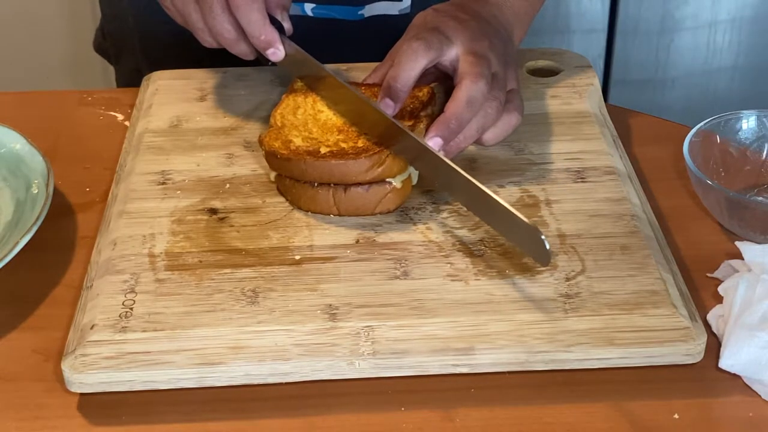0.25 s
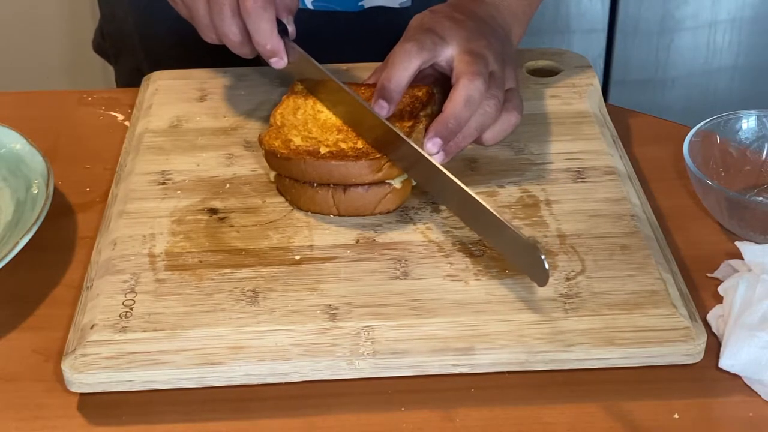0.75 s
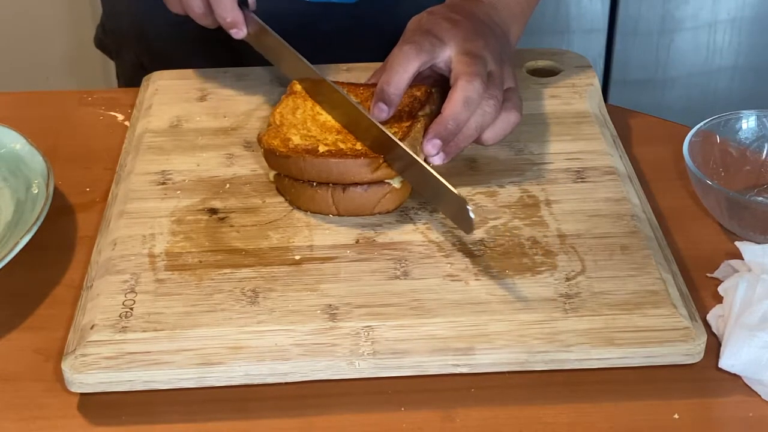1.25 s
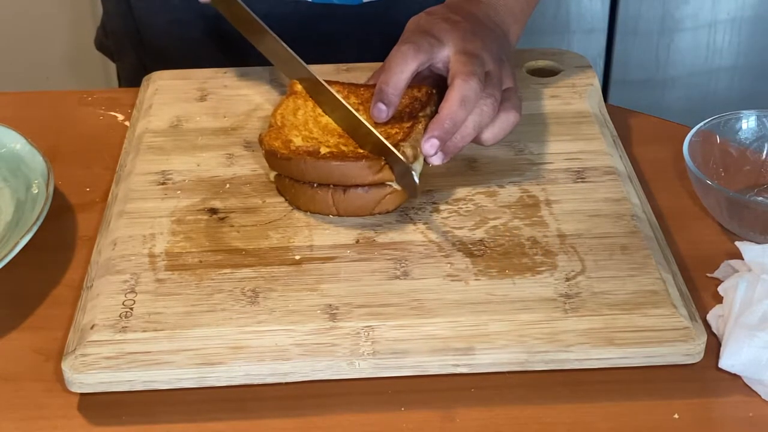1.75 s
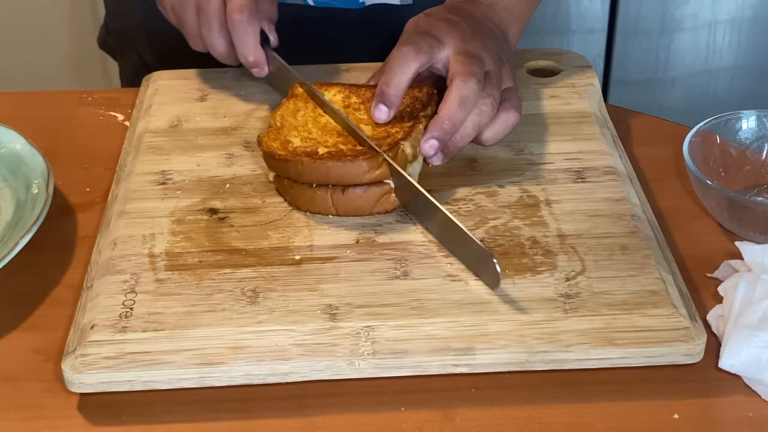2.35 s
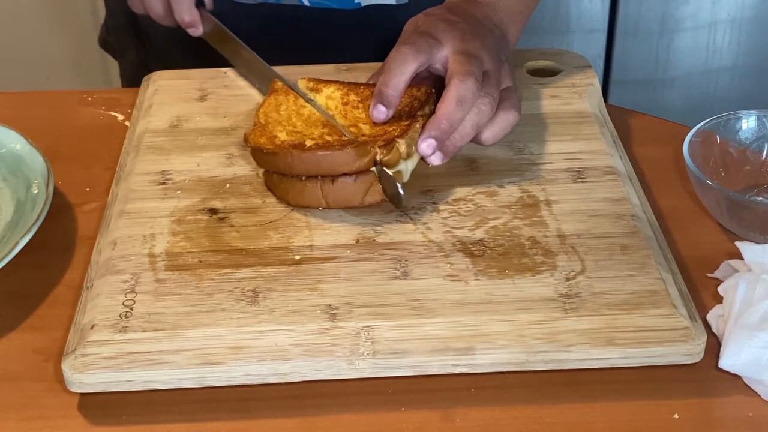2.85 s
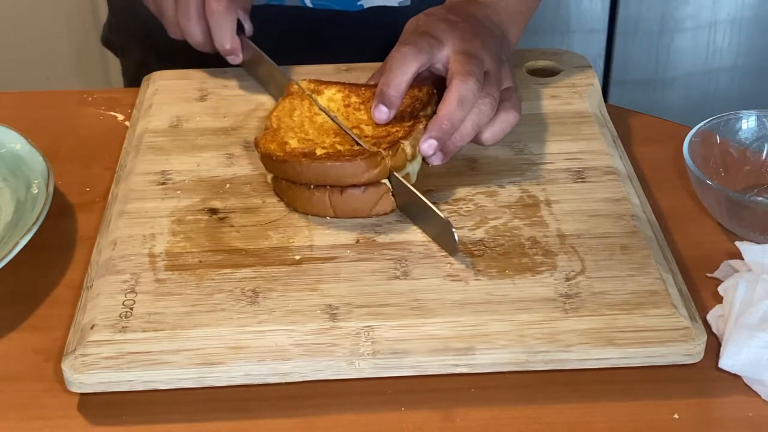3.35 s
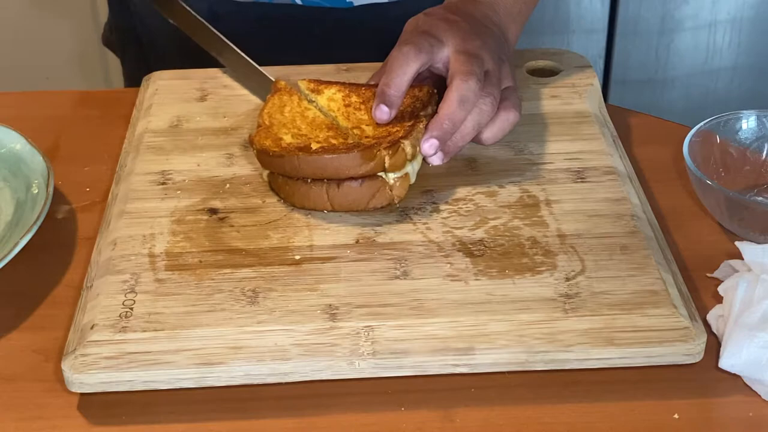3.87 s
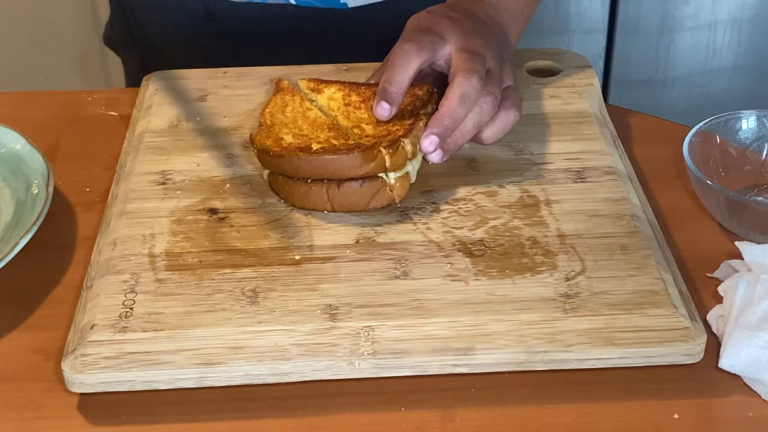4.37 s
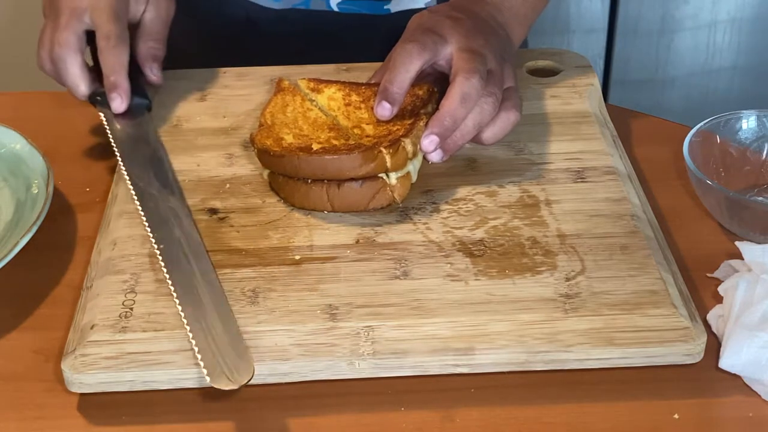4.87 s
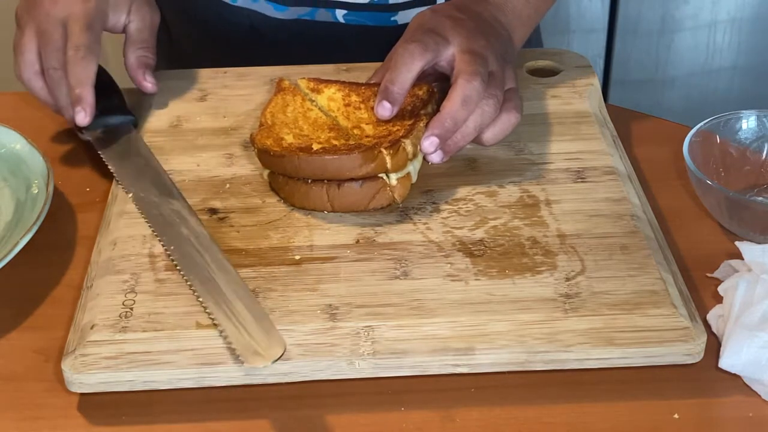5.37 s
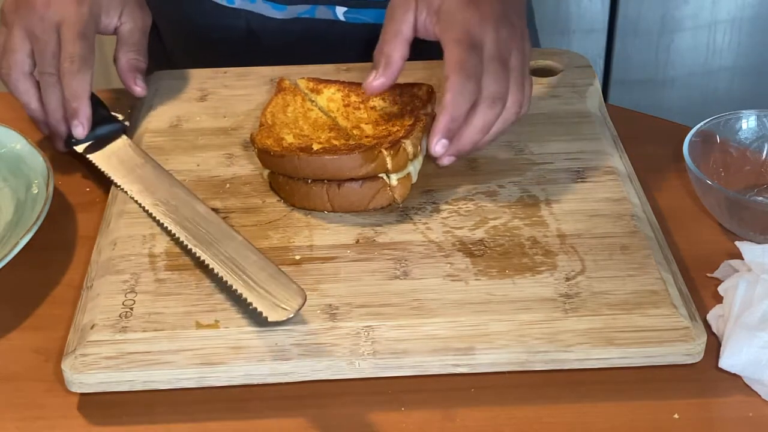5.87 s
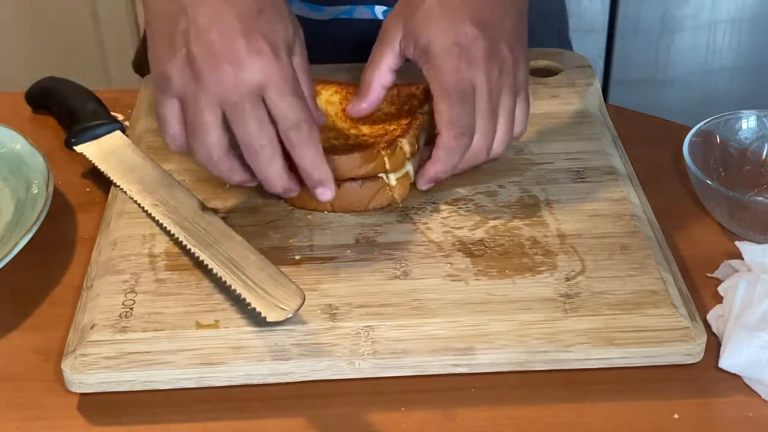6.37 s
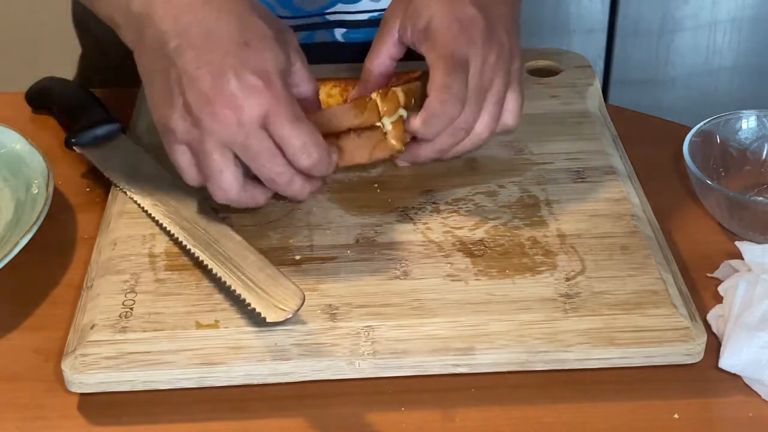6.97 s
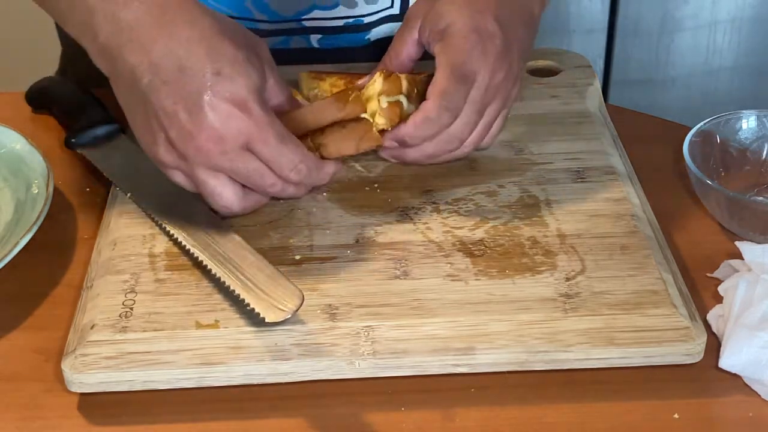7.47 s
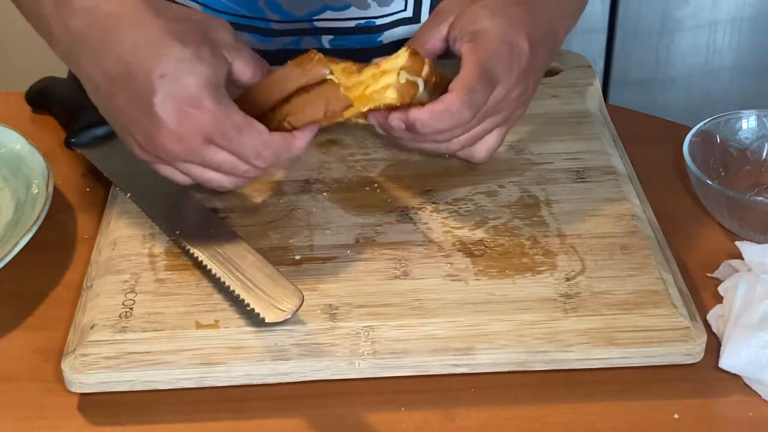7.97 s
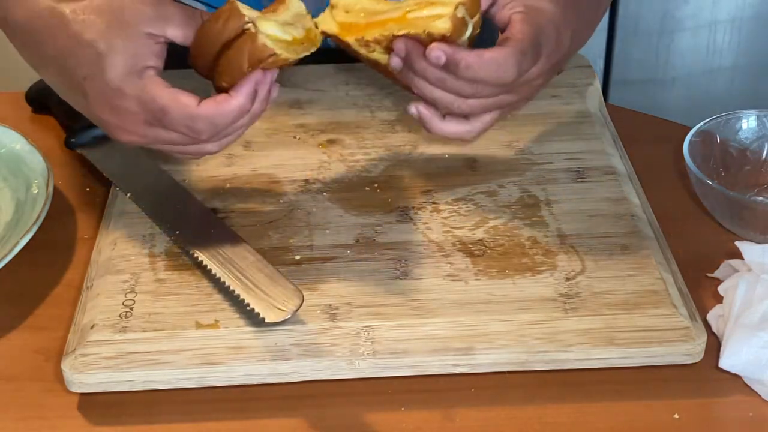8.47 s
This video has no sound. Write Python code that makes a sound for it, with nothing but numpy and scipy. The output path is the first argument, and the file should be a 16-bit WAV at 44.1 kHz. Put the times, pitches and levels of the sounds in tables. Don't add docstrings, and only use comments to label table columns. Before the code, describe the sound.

Crunchy, raspy knife strokes cut toasted bread over a steady low fan hum, followed by a wooden double knock and small dry crackles.

```python
import sys
import numpy as np
from scipy import signal
from scipy.fft import rfft, irfft, next_fast_len
from scipy.io import wavfile
from scipy.ndimage import uniform_filter1d

SR = 44100
rng = np.random.default_rng(int(sys.argv[2]) if len(sys.argv) > 2 else 0)


def master(y):
    cut = np.clip(np.atleast_2d(y).T, -1, 1)
    pcm = np.round(cut * 32767)
    wavfile.write(sys.argv[1], SR, pcm.astype(np.int16))


def gain_from_decibels(decibels):
    exponent = np.asarray(decibels, float) / 20
    return 10 ** exponent


N = 384904
SIZE = 2 * next_fast_len(N // 2 + 1)
HZ = np.maximum(np.fft.rfftfreq(SIZE, 1 / SR), 1)
SPEED_POWER = 1.19

# pitch in Hz, level in dB.
UNLIKE_SHARE = [(50, -36), (130, -13), (300, -15.5), (550, -1.5), (750, 2), (1100, -3), (1400, -3),
                (1800, -18), (2200, -21.5), (3500, -5.5), (6000, -18), (9000, -18), (12500, -15)]


def rms_one(x):
    return x / np.sqrt(np.mean(x ** 2) + 1e-20)


def at_hz(points):
    hz, db = np.transpose(points)
    return np.interp(np.log(HZ), np.log(hz), db)


def filtered(x, response):
    return irfft(rfft(x, SIZE) * response, SIZE)[..., :N]


def coloured(x, spectrum):
    return rms_one(filtered(x, gain_from_decibels(at_hz(spectrum))))


def band(x, low_hz, high_hz):
    edges = [low_hz, min(high_hz, .45 * SR)]
    return signal.sosfilt(signal.butter(2, edges, "band", fs=SR, output="sos"), x)


def resonate(x, hz, width_hz):
    r = np.exp(-np.pi * width_hz / SR)
    feedback = [1, -2 * r * np.cos(2 * np.pi * hz / SR), r * r]
    return signal.lfilter([(1 - r * r) / 2, 0, (r * r - 1) / 2], feedback, x + 1e-18)


def resonate_steep(x, hz, width_hz, outer):
    return resonate(resonate(x, hz, width_hz), hz, outer * width_hz)


def body(x, modes):
    out = 0
    for k, (hz, width_hz, db) in enumerate(modes):
        out = out + gain_from_decibels(db) * resonate_steep(x, hz, width_hz, 2) * (-1) ** k
    return rms_one(out)


def drift(rate_hz):
    r = np.exp(-2 * np.pi * rate_hz / SR)
    return rms_one(signal.lfilter([1], [1, -2 * r, r * r], rng.standard_normal(N + SR))[SR:])


def grains(per_s, spread_db):
    sizes = gain_from_decibels(spread_db * np.minimum(rng.exponential(1, N), 5)) * rng.choice([-1, 1], N)
    return rms_one(sizes * (rng.random(N) < per_s / SR))


def swing(u, top):
    top = np.clip(top, .02, .98)
    rise_and_fall = np.clip(np.minimum(u / top, (1 - u) / (1 - top)), 0, 1)
    return np.sin(np.pi / 2 * rise_and_fall) ** SPEED_POWER


def strokes(rows, level_db):
    t, power = np.arange(0, N + 64, 64) / SR, 1e-12
    for s, length, top, *row in rows:
        peaks = np.c_[gain_from_decibels(np.array(level_db(*row)))]
        power = power + (peaks * swing((t - s) / length, top)) ** 2
    return np.array([np.interp(np.arange(N) / SR, t, 10 * np.log10(p)) for p in power])


def between(ends, share):
    return ends[0] + (ends[1] - ends[0]) * share


def fan():
    # pitch in Hz, width in Hz, level in dB.
    rumble_modes = [(86.4, 21, -49), (104.4, 10, -44), (118.5, 4, -54.5), (161, 29.6, -49),
                    (186.3, 27, -49), (247.2, 59.6, -52), (293, 51.5, -53.5), (339, 46.4, -52),
                    (367.3, 57, -57.5), (980, 94, -74.5), (1068, 49, -75), (1142, 15, -87),
                    (1392, 85, -72.5), (1528, 23, -75.5)]
    # pitch in Hz, level in dB per Hz.
    air_noise = [(240, -49), (400, -9.5), (424, 1), (518, -0.5), (672, -15), (754, -22), (1020, -16),
                 (1080, -17), (1180, -20), (1530, -22.5), (1760, -21), (2160, -29), (2560, -35.5),
                 (3400, -37), (3900, -40.5), (5900, -50), (6300, -50.5), (8650, -52.5), (12500, -55),
                 (16200, -99), (22000, -120)]
    motor_hz, motor_db, air_db = 59.14, -41.5, -57
    rumble = 0
    for hz, width_hz, db in rumble_modes:
        noise = rng.standard_normal((2, N))
        rumble = rumble + gain_from_decibels(db) * rms_one(resonate_steep(noise, hz, width_hz, 3))
    air = gain_from_decibels(air_db + 0.96 * drift(20)) * coloured(rng.standard_normal((2, N)), air_noise)
    mid, side = rumble + air
    side = filtered(side, gain_from_decibels(at_hz(UNLIKE_SHARE)))
    turn = 2 * np.pi * motor_hz * np.arange(N) / SR + 0.092 * drift(1.1)
    tone = np.sqrt(2) * gain_from_decibels(motor_db + 1.03 * drift(7.3)) * np.sin(turn)
    return mid + tone + side * [[1], [-1]]


def contact():
    # start in seconds, length in seconds, moment of top speed 0-1,
    # force in dB, depth from 0 crust to 1 board.
    saw_strokes = [(0.0, 0.082, 0.35, -80.5, 0.49), (.06, 0.38, 0.13, -79, 1), (.2, 0.42, 0.78, -78, 0.42),
                   (.58, 0.35, 0.3, -77.5, 0.038), (.74, 0.98, 0.16, -66, 0.083),
                   (.8, 0.57, 0.1, -70.5, 0.73), (1.02, 0.57, 0.73, -60.5, 0.16),
                   (1.6, 0.43, 0.22, -72.5, 0.011), (1.45, 0.32, .45, -92, 0.18),
                   (1.85, 0.35, 0.83, -77, 0.15), (2.15, 0.49, 0.5, -77, 0.99),
                   (2.04, 0.28, 0.3, -71.5, 0.55), (2.33, 0.41, 0.54, -76, 0.21),
                   (2.55, 0.43, 0.48, -71.5, 0.24), (2.93, 0.41, 0.49, -65, 0.64),
                   (3.2, 0.39, 0.7, -70, 0.92), (3.37, 0.75, 0.21, -65, 0.59), (3.6, 0.33, 0.77, -71, 0.29),
                   (3.8, 0.33, 0.52, -58.5, 0.84)]
    # start in seconds, length in seconds,
    # moment of top speed 0-1, force in dB, softness from 0 crust to 1 crumb.
    pulls = [(1.64, 0.36, .25, -84, .6), (4.02, 0.74, 0, -72.5, 0.67), (4.6, 0.21, 0.35, -84.5, 0.28),
             (4.98, 0.19, 0.35, -85, 0.37), (5.54, 0.35, 0.44, -90, .0), (5.85, 0.74, 0.27, -76, 0.4),
             (6.25, 0.32, 0.72, -76, 0.31), (6.5, 0.31, 0.3, -77, 0.28), (6.595, 0.07, 0.37, -66, 0.35),
             (6.76, 0.22, 0.34, -83, 0.13), (6.9, 0.29, 0.55, -83.5, 0.23), (7.1, 0.62, 0.43, -75.5, 0.29),
             (7.64, 0.26, 0.18, -78.5, 0.5), (7.96, 0.23, 0.4, -83, 0.29), (8.15, 0.2, .5, -87, 0.44),
             (8.3, 0.26, 0.45, -85.5, 0.8), (8.36, .1, 0.6, -84, 0.43), (8.55, 0.13, .4, -95, 0.044)]
    saw = strokes(saw_strokes, lambda db, deep: (
        db + between((5, -10.5), deep), db + between((3.5, -13), deep), db))
    grip = strokes(pulls, lambda db, soft: (
        db + between((4.5, -17.5), soft), db, db + between((2, 1), soft)))
    return 10 * np.log10(gain_from_decibels(2 * saw) + gain_from_decibels(2 * grip))


def flakes(clicks):
    pitches = np.geomspace(1900, 12000, 26) * gain_from_decibels(rng.normal(0, 0.14, 26))
    dealt = rng.integers(0, len(pitches), N)
    out = 0
    for k, hz in enumerate(pitches):
        width_hz = 72 * np.sqrt(hz / 4000)
        out = out + resonate(clicks * (dealt == k), hz, width_hz) * np.sqrt(hz)
    return rms_one(out)


def crust():
    # pitch in Hz, level in dB per Hz.
    crackle_colour = [(4820, -20), (8200, -7.5), (9110, -6.5), (10900, -2.5), (11600, -2.5), (12300, -10),
                      (15900, -9), (22000, -120)]
    tearing_colour = [(2410, -36), (4100, -0.5), (4560, -2), (5140, 1.5), (5590, 0), (6030, 4),
                      (7320, -2.5), (7690, 6.5), (8200, -35), (10700, -52), (18000, -120)]
    rasp_colour = [(1180, -1.5), (2000, -10.5), (2280, -9), (2730, -11), (3390, -10.5), (4100, -15.5),
                   (5330, -22), (9020, -120)]
    crackle_db, tearing_db, rasp_db = contact()
    clumps = gain_from_decibels(0.3 * drift(60) + 0.62 * drift(3.6) + 1.0 * drift(22))
    cells = .5 * grains(1500, spread_db=4.5) + 0.45 * flakes(grains(4000, spread_db=2.5))
    cells = cells * clumps
    hiss = rng.standard_normal((3, N)) * clumps
    crackle = gain_from_decibels(crackle_db + 2.5) * coloured(cells + 1.6 * hiss[0], crackle_colour)
    tearing = gain_from_decibels(tearing_db - 2.5) * coloured(cells + 1.0 * hiss[1], tearing_colour)
    rasp = gain_from_decibels(rasp_db + 5.0) * coloured(cells + 0.93 * hiss[2], rasp_colour)
    return crackle + tearing + rasp


def snaps():
    crust_snaps = [(0.2667, -64, -6), (0.29, -57, -10), (0.34, -53, -12), (0.419, -47.5, -23),
                   (0.482, -56, -18), (0.6338, -43.5, -7), (0.6822, -40.5, -14), (0.7246, -56, -15),
                   (0.751, -41.5, -15), (0.776, -61, -24), (0.804, -49, -20), (0.8196, -43, -12),
                   (0.841, -51.5, -18), (0.8593, -40, -15), (0.8755, -40, -14), (0.9236, -36.5, -24),
                   (0.9776, -44, -9), (0.931, -51, -2.5), (1.013, -44, -14), (1.059, -43, -15),
                   (1.1133, -43, -13), (1.182, -47, -3), (1.388, -46, -14),
                   (1.6676, -44, -21), (2.0716, -52, -8), (2.103, -45, -10), (2.112, -52.5, 3.5),
                   (2.122, -50, -5), (2.14, -52, -5), (2.339, -67, 0), (2.4845, -55, -10),
                   (2.6433, -53, -23), (2.669, -56, 1), (2.738, -45, -14), (2.991, -62, -9),
                   (3.748, -50, -10), (3.8274, -44.5, -13), (4.6841, -65, -6), (4.998, -67, -18),
                   (5.0483, -50, -17),
                   (6.181, -55, -14), (6.3065, -47.5, -21), (6.622, -50, -9), (6.78, -64, -12),
                    (6.8133, -63, -7), (6.9586, -57, -13), (7.0936, -66, -23), (7.416, -52, -22),
                    (7.453, -54, -14), (7.679, -62, 5), (7.748, -60, -5), (7.7925, -61, -6),
                    (7.877, -70, 6), (7.9959, -60.5, 3.5), (8.174, -60, -6), (8.236, -66, -7),
                    (8.3947, -52, -15), (8.5872, -71, -11),
                   (0.0034, -53, -4), (0.016, -62, -19), (0.79, -52, -14), (0.741, -53, -20),
                   (0.45, -61, -15), (5.746, -56, -20), (7.57, -61, -4), (7.842, -69, -20),
                   (7.86, -70, -20), (8.282, -68, -18), (6.635, -52, -12), (8.1, -57, -15)]
    out, t = np.zeros(N), np.arange(int(0.041 * SR)) / SR
    shape = np.exp(-t / 0.00071) + 0.15 * np.exp(-t / 0.01)
    for s, db, body_rel in crust_snaps:
        noise = rng.standard_normal(len(t)) * shape
        top = band(noise, 9600, 12040) + gain_from_decibels(-3.5) * band(noise, 5300, 8200)
        low = band(noise, 1940, 4460)
        both = top / np.abs(top).max() + gain_from_decibels(body_rel + 3.5) * low / np.abs(low).max()
        at = int(s * SR)
        out[at:at + len(t)] += gain_from_decibels(db + 1.5) * both[:N - at]
    return out


def slides(rows, width_share, flutter_db):
    out = np.zeros(N + SR)
    for s, length, top, db, hz in rows:
        noise, slow = rng.standard_normal((2, SR))
        loudness = gain_from_decibels(db) * swing(np.arange(SR) / (length * SR), top)
        flutter = gain_from_decibels(flutter_db * rms_one(uniform_filter1d(slow, size=900)))
        width_hz = np.clip(width_share, .005, .2) * hz
        at = int(max(s, 0) * SR)
        out[at:at + SR] += loudness * flutter * rms_one(resonate_steep(noise, hz, width_hz, 2))
    return out[:N]


def singing():
    # start in seconds, length in seconds, moment of top speed 0-1, level in dB, pitch in Hz.
    sung_slides = [(0.04, 0.2, 0.4, -86, 6100), (.3, 0.45, .4, -84, 6050), (.4, 0.18, .4, -88, 7800),
                   (3.05, 0.24, 0.5, -75.5, 5200), (3.5, .3, .5, -82, 3900), (3.904, .16, .5, -71, 7100),
                   (4.08, 0.39, 0.3, -83, 6120), (4.1, .32, .4, -86, 7800), (4.08, .4, .4, -88, 7670),
                   (4.1, 0.39, 0.2, -78, 10500), (4.08, .36, 0.3, -82, 9800), (4.55, 0.32, .6, -88, 6150),
                   (5.55, .2, .5, -92, 7700), (5.88, .4, .4, -91, 7600), (7.2, .4, .5, -93, 7570),
                   (7.992, .02, .25, -79, 4200), (3.88, .14, .4, -59, 1410), (3.86, .14, 0.36, -67, 2400),
                   (3.94, 0.11, .5, -66, 5000), (2.76, .04, .3, -75, 2800), (0.79, 0.8, 0.5, -74, 6600),
                   (6.38, .12, 0.44, -66, 1540), (1.66, .25, 0.1, -71.5, 6600)]
    return slides(sung_slides, width_share=0.045, flutter_db=2)


def scuffing():
    # start in seconds, length in seconds, moment of top speed 0-1, level in dB, centre in Hz.
    dull_drags = [(.05, 0.34, .5, -65.5, 1530), (3.88, 0.21, 0.6, -65, 4970), (3.88, 0.2, .5, -67, 3500),
                  (1.25, .25, .5, -72, 5500), (7.2, 0.5, .5, -86, 5900), (.82, 0.46, .3, -69, 1100),
                  (.82, 0.55, .3, -74, 2400), (.8, 0.39, .3, -77, 4000), (1.1, 0.27, 0.6, -66, 6400),
                  (5.9, 0.47, .4, -83, 10200), (7.15, 0.5, .4, -81, 11000)]
    return slides(dull_drags, width_share=.12, flutter_db=2)


def bursts(rows, low_hz, high_hz, decay_s):
    out, t = np.zeros(N), np.arange(SR // 20) / SR
    for s, db in rows:
        burst = band(rng.standard_normal(len(t)) * np.exp(-t / decay_s), low_hz, high_hz)
        at = int(s * SR)
        out[at:at + len(t)] += gain_from_decibels(db) * burst / np.abs(burst).max()
    return out


def tooth_thuds():
    # start in seconds, peak in dB.
    thumps = [(0.749, -55), (0.858, -46), (0.874, -45), (0.93, -48), (1.058, -48), (1.114, -45),
              (1.179, -48), (1.223, -45), (1.269, -49), (1.349, -48), (1.382, -48), (1.479, -53),
              (2.774, -48)]
    return bursts(thumps, low_hz=646, high_hz=2610, decay_s=.004)


def board_rub():
    # start in seconds, length in seconds, moment of top speed 0-1,
    # whine in dB, buzz in dB above the whine.
    blade_strokes = [(.78, 0.76, 0.7, -65.5, 4), (1.1, 0.4, 0.6, -68, 3), (2.06, 0.14, 0.65, -66.5, -7),
                     (2.74, 0.19, 0.5, -67, 9.5), (3.0, 0.31, 0.27, -62, 10.5),
                     (3.38, 0.19, 0.13, -60.5, 12.5), (3.45, .14, 0.62, -53.5, 13.5),
                     (3.55, 0.24, 0.31, -51, 10.5), (3.72, 0.23, 0.06, -60, 13.5),
                     (3.84, 0.36, 0.17, -62.5, 0)]
    # start in seconds, length in seconds, moment of top speed 0-1, boom in dB.
    board_strokes = [(1.1, 0.41, 0.87, -50.5), (2.72, 0.21, 0.98, -46), (2.95, 0.31, 0.56, -41),
                     (3.05, 0.19, 0.76, -41.5), (3.36, 0.55, 0.1, -40), (3.62, 0.26, 0.85, -39.5),
                     (3.84, 0.33, 0.32, -36.5), (8.4, 0.35, 0.43, -46)]
    # pitch in Hz, width in Hz, level in dB.
    buzz_modes = [(727, 84, 1), (821, 45, 2), (946, 88, 4.5)]
    whine_modes = [(1320, 410, 3), (1750, 180, -2.5), (1930, 130, 1), (2215, 170, -5.5), (3450, 320, -7),
                   (4870, 360, -21)]
    boom_modes = [(245, 110, -0.5), (325.4, 69.4, 2), (364, 87, -6)]
    buzz_db, whine_db = strokes(blade_strokes, lambda db, buzz: (db + buzz, db))
    boom_db, = strokes(board_strokes, lambda db: (db,))
    slips = grains(1200, spread_db=2.5) + 0.35 * rng.standard_normal(N)
    slips = slips * gain_from_decibels(1.1 * drift(55))
    buzz = gain_from_decibels(buzz_db - 2.5) * body(slips, buzz_modes)
    whine = gain_from_decibels(whine_db) * body(slips, whine_modes)
    boom = gain_from_decibels(boom_db + 2.0) * body(slips, boom_modes)
    return buzz + whine + boom


def knocks():
    # start in seconds, peak in dB, brightness in dB.
    hits = [
        (4.939, -46.5, -26),
        (5.748, -52, -30),
        (5.7582, -21, -3.5),
        (5.8203, -26, -9),
    ]
    # pitch in Hz, level in dB, seconds to fade by 60 dB.
    wood_modes = [(104, -4, 0.22), (148.8, -6, 0.44), (345, -11.5, 0.17), (551, -10.5, 0.12),
                  (814, 0.5, 0.04), (1027, 5, 0.025), (1120, -6.5, 0.081), (1525, -6, 0.042),
                  (1820, -3, 0.028), (2230, -3, 0.017), (2570, 5.5, 0.0092), (3380, -6, 0.015)]
    # lowest Hz, highest Hz, level in dB, seconds to fade by 60 dB.
    clatter = [(88.5, 420, -6, 0.45), (673, 1300, -9.5, 0.42), (1320, 1840, -22, 0.68),
               (2300, 3100, -41, 0.19), (4040, 9000, -45, 0.52)]
    out, t = np.zeros(N), np.arange(int(.45 * SR)) / SR
    push = 1 - np.exp(-t / .0012)
    for s, db, bright_rel in hits:
        start = int(s * SR)
        for lag_s, lag_db in [(0, -8), (.006, -22)]:
            noise, hit = rng.standard_normal(len(t)), 0
            for hz, level_db, t60 in wood_modes:
                luck, turn = rng.random(2)
                tone = np.sin(2 * np.pi * (hz * t + 0.27 * turn))
                hit = hit + gain_from_decibels(level_db + 5.6 * luck - 60 * t / t60) * tone
            for low_hz, high_hz, tail_db, t60 in clatter:
                hit = hit + gain_from_decibels(tail_db - 60 * t / t60) * rms_one(band(noise, low_hz, high_hz))
            at = int((s + lag_s) * SR)
            out[at:at + len(t)] += gain_from_decibels(db + lag_db) * hit * push
        crack = band(noise * np.exp(-t / 0.0011), 2600, 6000)
        out[start:start + len(t)] += gain_from_decibels(db + bright_rel - 7.5) * crack / np.abs(crack).max()
    return out


def crumb_ticks():
    # start in seconds, peak in dB.
    ticks = [(5.0345, -65), (5.6101, -65), (5.6281, -60), (5.6694, -72), (5.6944, -70), (6.4163, -60),
             (8.088, -68)]
    return bursts(ticks, low_hz=9300, high_hz=12300, decay_s=.003)


def scatter(x):
    return filtered(x * drift(60), 1j * gain_from_decibels(at_hz(UNLIKE_SHARE) - 5.5)) * [[1], [-1]]


def kitchen(x):
    t60_s, wall_cut_hz = 0.74, 1300
    size = next_fast_len(N + SR)
    hz, out = np.arange(size // 2 + 1) * SR / size, []
    for lags in rng.uniform(0.026, 0.057, (2, 8, 1)):
        loss = gain_from_decibels(-60 * lags / t60_s * (1 + (hz / wall_cut_hz) ** 2))
        loop = loss * np.exp(-2j * np.pi * hz * lags)
        echoes = np.sum(loop / (1 - loop), axis=0)
        out.append(irfft(rfft(x, size) * echoes, size)[:N])
    return np.array(out)


def ports(x):
    # pitch in Hz, signed gain.
    side_turn = [(50, -.12), (450, -.42), (700, -.1), (1000, .7), (1350, .03), (2300, .03), (3400, .38),
                 (5200, .1), (7850, .05), (8600, 1.5), (9300, 1.1), (10700, .03), (12000, -.9),
                 (12800, -2.)]
    turn = np.interp(HZ, *np.transpose(side_turn))
    loss = (1 + turn ** 2) ** -.25
    bass_lean = -0.053 / (1 + (HZ / 700) ** 2)
    mid, side = (x[0] + x[1]) / 2, (x[0] - x[1]) / 2
    side = side + filtered(mid, loss * (1j * turn + bass_lean))
    return filtered(mid, loss) + side * [[1], [-1]]


def scene():
    sawing = crust() + snaps() + singing() + scuffing() + tooth_thuds() + board_rub() + crumb_ticks()
    near = sawing + knocks()
    return near + scatter(sawing) + gain_from_decibels(-33) * kitchen(near) + fan()


def top_cut(x):
    return signal.sosfilt(signal.butter(12, 15750, fs=SR, output="sos"), x)


def record(dry):
    no_bass = signal.butter(2, 38, "high", fs=SR, output="sos")
    no_top = signal.cheby2(16, 50, 13100, "low", fs=SR, output="sos")
    heard = signal.sosfiltfilt(no_bass, ports(dry))
    air = gain_from_decibels(-9) * band(band(heard.mean(axis=0), 14500, 15700), 14300, 15800)
    heard = signal.sosfilt(no_top, heard) + air
    closing = np.clip((N - np.arange(N)) / (.006 * SR), 0, 1)
    return top_cut(heard * closing)


dry = scene()
out = record(dry)
master(out)
```